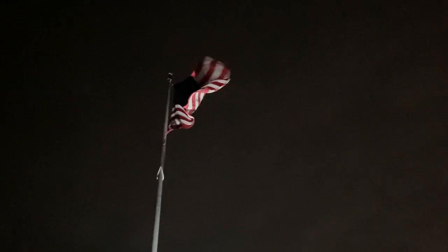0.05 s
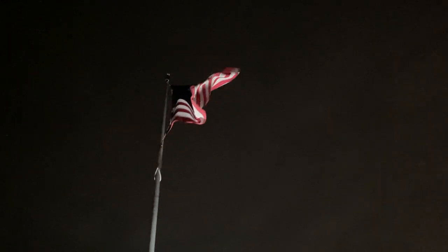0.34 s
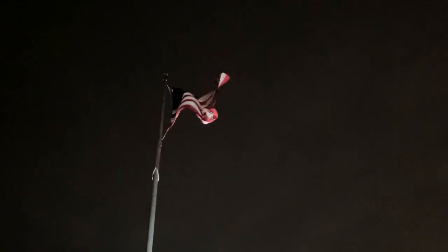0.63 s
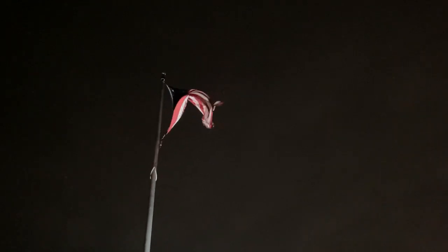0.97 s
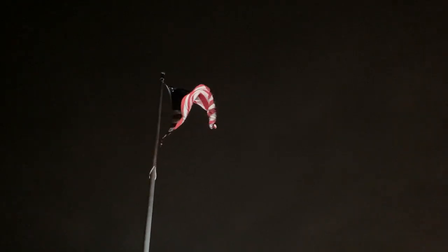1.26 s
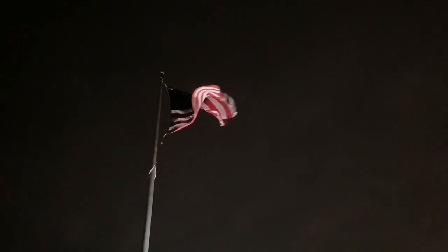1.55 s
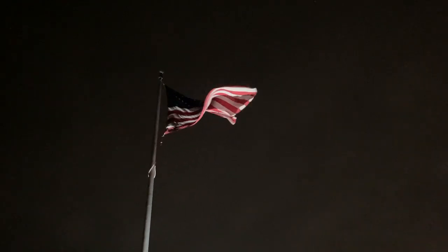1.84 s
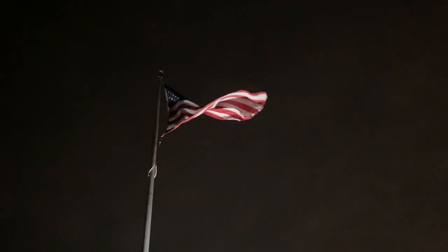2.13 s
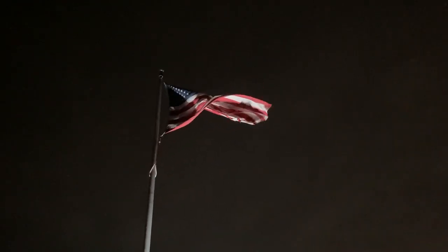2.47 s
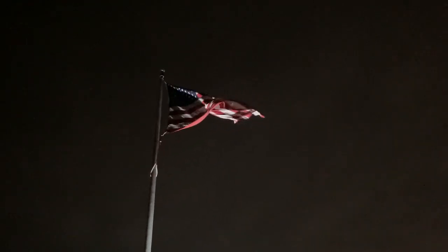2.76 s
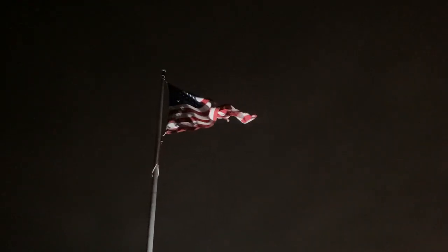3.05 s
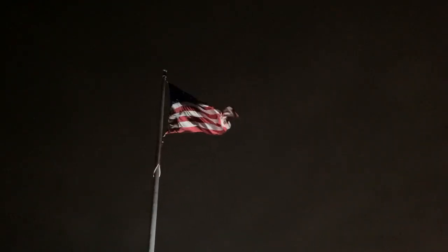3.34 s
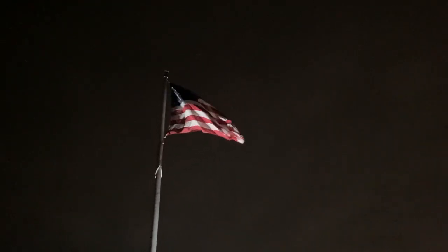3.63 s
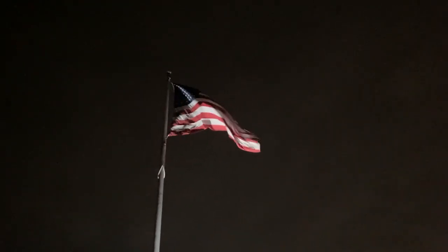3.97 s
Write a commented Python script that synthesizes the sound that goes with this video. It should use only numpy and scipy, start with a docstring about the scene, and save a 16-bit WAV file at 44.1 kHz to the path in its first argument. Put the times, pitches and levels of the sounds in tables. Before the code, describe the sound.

Metal clanks from a hook hitting a flagpole outdoors: a quick cluster first, two single knocks later. Between them come soft flag flaps and a distant car, while low wind increasingly buffets the microphone.

```python
"""Flag and metal pole at night

A flag flaps in soft bursts of noise. Its snap hook knocks and rattles on the tall pole; each impact
excites the pole's modes, which ring briefly. Gusts carry eddies past the microphone, whose pressure
is heard as a low flutter and thumps. A far car passes over a steady wash of traffic and faint hiss."""
import sys
import numpy as np
from scipy import signal
from scipy.fft import rfft, irfft
from scipy.io import wavfile
from scipy.ndimage import uniform_filter1d

SR = 44100
rng = np.random.default_rng(int(sys.argv[2]) if len(sys.argv) > 2 else 0)


def output_pcm(signal):
    """Save a mono or channel-first signal as 16-bit PCM at the path in sys.argv[1].

    Samples are clipped to [-1, 1] before scaling.
    """
    pcm = np.clip(np.atleast_2d(signal).T, -1, 1) * 32767
    wavfile.write(sys.argv[1], SR, np.round(pcm).astype(np.int16))


N = 176400

# impacts of the hook on the pole: (time [s], level [dB], treble tilt [dB/octave])
HOOK_IMPACTS = [(0.1895, -44, -2), (0.215, -54, -4.5), (.2198, -52, -5), (0.2433, -57, -5.5),
                (0.302, -54, -11), (0.308, -53.5, -8.5), (0.3215, -51, -4), (.329, -46.5, -5),
                (0.4535, -64, -12), (0.6657, -61, -13), (0.731, -61, -13), (1.391, -65.5, -11),
                (2.6584, -42.4, -3), (3.1258, -64.5, -7), (3.7535, -48.5, -12), (3.774, -59, -14)]
# crack of the contact: (frequency [Hz], relative level [dB])
CRACK_SPECTRUM = [(300, -39), (1200, -6.5), (3500, 8), (4500, 5), (5300, 5.5), (6100, -11), (8200, -5),
                  (9100, -26), (11000, -10), (15000, -26)]
# main modes of the pole: (frequency [Hz], relative level [dB])
POLE_MODES = [(1150, -4), (1388, -3), (1469, -2), (1655, -3), (1991, -3), (2222, -5), (2470, -3),
              (2675, -4), (2788, 0), (3032, 2), (3111, -1), (3407, 0), (3558, -2), (3671, 0), (3936, -5),
              (5005, -2)]
# clatter of its many weaker modes: (frequency [Hz], relative level [dB])
CLATTER_SPECTRUM = [(200, -31), (500, -2), (1400, 0.5), (2300, -7), (3400, -6), (4400, -3.5), (5300, -4.5),
                    (6100, -19.5), (8300, -11.5), (9100, -36), (15000, -54)]
# damping of those modes: (frequency [Hz], time to fall 60 dB [s])
CLATTER_DECAY = [(500, 0.19), (2500, 0.25), (5000, 0.16), (8000, 0.078), (12000, 0.059)]
# light touches of the hook alone: (time [s], level [dB], frequency [Hz])
HOOK_CLINKS = [(0.734, -72, 2850), (2.485, -70, 2720)]
# dull knocks as the hook falls back: (time [s], level [dB])
HOOK_KNOCKS = [(.316, -57.5), (.3415, -60), (2.672, -57)]
# one dull knock: (frequency [Hz], relative level [dB])
KNOCK_SPECTRUM = [(400, -18), (1200, 12), (2000, 2.5), (3200, -41.5)]
# tiny bright tick of the fittings: (time [s], level [dB])
FITTING_TICKS = [(.5655, -77.5)]
# that tick: (frequency [Hz], relative level [dB])
TICK_SPECTRUM = [(2000, -15), (9100, -7), (11000, 3), (13000, -17)]
# flaps of the cloth: (time [s], level [dB])
CLOTH_FLAPS = [(.392, -45.5), (.654, -48), (.77, -59), (1.066, -48.5)]
# one flap: (frequency [Hz], relative level [dB])
FLAP_SPECTRUM = [(50, -5.5), (110, 6.5), (200, -4), (500, -14), (1200, -30), (6000, -72)]
# wind at the microphone: (time [s], level [dB])
GUST_LEVELS = [(0, -51), (.35, -56), (.9, -53), (1.02, -61.5), (1.1, -52), (1.6, -51), (1.73, -55.5),
               (1.92, -45.5), (2.32, -53), (2.44, -47.5), (2.62, -54), (2.72, -43), (2.84, -42),
               (2.885, -57), (3.02, -41), (3.27, -46), (3.34, -62), (3.47, -46.5), (3.55, -57.5),
               (3.65, -41), (3.82, -38), (3.92, -48.5), (4, -41.5)]
# eddy pressure in a usual gust: (frequency [Hz], relative level [dB])
BUFFET_SPECTRUM = [(15, -38.5), (25, -21.5), (38, -9.5), (50, 1.5), (77, 0), (100, -6), (125, -10),
                   (170, -26.5), (1500, -110)]
# single large eddies: (time [s], level [dB], Gaussian half-width [s])
LARGE_EDDIES = [(1.561, -40, 0.017), (1.653, -40, 0.015), (2.383, -38.5, 0.017), (2.683, -40, 0.017),
                (2.786, -32, 0.023), (2.916, -37.5, 0.0095), (2.972, -34, 0.008), (3.092, -35.5, 0.018),
                (3.264, -41, 0.012), (3.678, -29.5, 0.0065), (3.772, -32, 0.012), (3.874, -31.5, .011)]
# passage of the far car: (time [s], level [dB])
CAR_LEVELS = [(0, -64), (.9, -71), (1.35, -60), (1.62, -53.5), (1.85, -56), (2.25, -60), (2.6, -63),
              (3.1, -66), (4, -72.5)]
# its tyres: (frequency [Hz], relative level [dB])
TYRE_SPECTRUM = [(200, -22), (450, -7), (660, -6.5), (770, 4), (880, 2), (980, -6), (1380, -6), (1510, -4),
                 (1720, -9.5), (1950, -26.5), (4000, -58.5)]
# wash of town traffic: (frequency [Hz], relative level [dB])
TOWN_SPECTRUM = [(20, -11.5), (55, 5), (125, 7), (175, 0.5), (250, -.5), (350, -5.5), (600, -3.5),
                 (850, -.5), (1150, -2.5), (1600, -9.5), (2000, -17.5), (2500, -27.5), (3500, -36),
                 (6000, -48)]
# microphone hiss: (frequency [Hz], relative level [dB])
HISS_SPECTRUM = [(1000, -7), (4000, 1.5), (5800, -1.5), (7800, 0), (8600, -5), (9150, -28.5), (9900, -2.5),
                 (11300, 0.5), (12700, -8.5), (13700, -14), (15000, -5.5)]
# likeness of left and right in the background: (frequency [Hz], correlation [0 to 1])
DIFFUSE_CORRELATION = [(60, 0.78), (300, 0.65), (1000, 0.8), (1900, 1), (3300, 0.099)]


def hook():
    """Impacts, clinks and knocks superpose; a path difference delays them at the right channel."""
    out = noise_bursts(HOOK_KNOCKS, KNOCK_SPECTRUM, rise_s=0.00072, fall_s=0.00072)
    for start, db, tilt_db in HOOK_IMPACTS:
        add(out, start, amp(db) * impact(tilt_db))
    for start, db, hz in HOOK_CLINKS:
        add(out, start, amp(db) * clink(hz))
    out[1] = irfft(rfft(out[1]) * delay(np.fft.rfftfreq(N, 1 / SR), lag_s=0.0001))
    return out


def impact(tilt_db, corner_hz=2320):
    """Impact excitation: a harder blow gives a stronger crack and more treble above the corner."""
    t = np.arange(SR // 3) / SR
    strike = amp(-4) * (amp(0.65 * tilt_db) * contact_crack(t) + pole_clatter(t) + pole_ring(t))
    return colour(strike, lambda hz: tilt_db * np.log2(np.maximum(hz / corner_hz, 1)))


def contact_crack(t, fall_s=0.0017):
    """A brief contact has a broad spectrum: an impulse and quickly dying noise."""
    contact = stereo_noise(len(t), correlation=0.9) * np.exp(-t / fall_s) + 2 * (t == 0)
    return unit_energy(colour(contact, lambda hz: lookup(CRACK_SPECTRUM, hz)))


def pole_clatter(t, rise_s=0.0024, chatter_db=3, chatter_s=0.0025):
    """Densely overlapping modes act as decaying noise, made uneven by the chattering hook."""
    bands, times, modes = signal.stft(stereo_noise(len(t), correlation=0.85), SR, nperseg=128)
    damping = amp(-60 * times / lookup(CLATTER_DECAY, bands)[:, None])
    decaying = signal.istft(modes * damping, nperseg=128)[1][:, :len(t)]
    chatter = unit_rms(uniform_filter1d(rng.standard_normal(len(t)), size=int(chatter_s * SR)))
    clatter = decaying * amp(chatter_db * chatter) * (1 - np.exp(-t / rise_s))
    return unit_energy(colour(clatter, lambda hz: lookup(CLATTER_SPECTRUM, hz)))


def pole_ring(t, t60_s=0.1, scatter_db=2):
    """Free vibration is a sum of damped normal modes, here varied in strength and phase."""
    ring = np.zeros(len(t))
    for hz, db in POLE_MODES:
        gain = amp(db + scatter_db * rng.standard_normal())
        ring += gain * np.sin(2 * np.pi * (hz * t + rng.random()))
    return unit_energy(np.array([ring, ring]) * amp(-60 * t / t60_s))


def clink(hz, t60_s=0.051):
    """Lightly touched, the hook rings as a damped oscillator of one frequency."""
    t = np.arange(SR // 10) / SR
    ring = np.sin(2 * np.pi * hz * t) * amp(-60 * t / t60_s)
    return unit_energy(np.array([ring, ring]))


def fittings():
    """A very short transient in the fittings is heard as a bright tick."""
    return noise_bursts(FITTING_TICKS, TICK_SPECTRUM, rise_s=0.00022, fall_s=0.0023)


def flag():
    """Each flap of the cloth displaces air in a soft, low pressure transient."""
    return noise_bursts(CLOTH_FLAPS, FLAP_SPECTRUM, rise_s=0.0016, fall_s=0.025)


def wind(smoothing_s=0.033, evenness=0.75):
    """Turbulent pressure at the microphone swells and quickens with each gust."""
    gust = envelope(GUST_LEVELS)
    travel = np.cumsum(eddy_speed(20 * np.log10(gust)))
    spectrum = amp(lookup(BUFFET_SPECTRUM, np.fft.rfftfreq(2 * N, 1 / SR)))
    field = irfft(rfft(stereo_noise(2 * N, correlation=0.77)) * spectrum)
    eddies = unit_rms(np.array([np.interp(travel, np.arange(2 * N), side) for side in field]))
    # partly even out chance swells, so that the gusts govern the level
    window = signal.windows.hann(2 * int(smoothing_s * SR) + 1)
    power = signal.fftconvolve((eddies ** 2).mean(0), window / window.sum(), "same")
    return gust * unit_rms(eddies / (abs(power) + 1e-6) ** (evenness / 2))


def thumps(usual_hz=66, scatter=0.08):
    """Each large eddy swings the pressure in both channels as a short Gaussian wave packet."""
    out, t = np.zeros(N), np.arange(N) / SR
    for centre, db, width_s in LARGE_EDDIES:
        hz = usual_hz * eddy_speed(db) * (1 + scatter * rng.standard_normal())
        swell = amp(db) * np.exp(-((t - centre) / width_s) ** 2 / 2)
        out += swell * np.sin(2 * np.pi * (hz * t + rng.random()))
    return out


def eddy_speed(db, usual_db=-44, octaves_per_db=0.015):
    """Convection: stronger gusts carry eddies faster. Gives speed relative to a usual gust."""
    return 2 ** (octaves_per_db * (db - usual_db))


def traffic():
    """Many distant sources merge into a wash, over which one car's tyre noise rises and fades."""
    town = amp(-58) * diffuse_noise(TOWN_SPECTRUM, patch_db=2.5)
    car = envelope(CAR_LEVELS) * diffuse_noise(TYRE_SPECTRUM, patch_db=3.0)
    return (town + car) * amp([[-0.6], [0.6]])  # slightly louder on the right


def hiss():
    """The microphone's self-noise sets a steady noise floor."""
    return amp(-84) * diffuse_noise(HISS_SPECTRUM, patch_db=0)


def diffuse_noise(spectrum, patch_db):
    """A diffuse field is partly coherent between two points; patch_db lets band levels drift."""
    hz = np.fft.rfftfreq(2048, 1 / SR)
    a, b, c, d, patches = rng.standard_normal((5, N // 512 + 5, len(hz)))
    patches = uniform_filter1d(patches, size=9, axis=0)  # smooth in time
    patches = unit_rms(uniform_filter1d(patches, size=5, axis=1))  # and in frequency
    left = a + 1j * b
    right = correlated(left, c + 1j * d, lookup(DIFFUSE_CORRELATION, hz)) * delay(hz, lag_s=0.000082)
    frames = np.array([left, right]) * amp(lookup(spectrum, hz) + patch_db * patches)
    return unit_rms(signal.istft(frames.transpose(0, 2, 1), nperseg=2048, noverlap=1536)[1][:, :N])


def noise_bursts(events, spectrum, rise_s, fall_s):
    """Unpitched transients: filtered noise with exponential rise and decay."""
    out, t = np.zeros((2, N)), np.arange(SR // 4) / SR
    for start, db in events:
        burst = stereo_noise(len(t), correlation=0.87) * (1 - np.exp(-t / rise_s)) * np.exp(-t / fall_s)
        add(out, start, amp(db) * unit_energy(colour(burst, lambda hz: lookup(spectrum, hz))))
    return out


def stereo_noise(size, correlation):
    """White noise, partly correlated between two channels."""
    left, independent = rng.standard_normal((2, size))
    return np.array([left, correlated(left, independent, correlation)])


def correlated(common, independent, correlation):
    """Independent noises add in power, so this blend keeps their level."""
    return correlation * common + np.sqrt(1 - correlation ** 2) * independent


def delay(hz, lag_s):
    """A time delay is a phase lag proportional to frequency."""
    return np.exp(-2j * np.pi * lag_s * hz)


def colour(x, gain_db, size=4096):
    """Minimum-phase filter: the phase follows from the log gain by the Hilbert transform."""
    log_gain = np.log(amp(gain_db(abs(np.fft.fftfreq(size, 1 / SR)))))
    response = np.fft.ifft(np.exp(signal.hilbert(log_gain).conj())).real
    return signal.fftconvolve(x, response[None, :size // 2], axes=1)[:, :x.shape[1]]


def amp(db):
    """Amplitude ratio of a level in decibels."""
    return 10 ** (np.asarray(db) / 20)


def unit_rms(x):
    """Normalisation to a mean power of 1."""
    return x / np.sqrt(np.mean(x ** 2) + 1e-20)


def unit_energy(x):
    """Normalisation of a transient to the energy of 10 ms at rms 1."""
    return x / np.sqrt(np.sum(x ** 2) / len(x) / (SR / 100) + 1e-20)


def lookup(table, hz):
    """Interpolation on a logarithmic frequency axis."""
    frequencies, values = np.transpose(table)
    return np.interp(np.log(hz + 1), np.log(frequencies + 1), values)


def envelope(points):
    """Amplitude envelope through points of (time [s], level [dB])."""
    return amp(np.interp(np.arange(N) / SR, *np.transpose(points)))


def add(mix, start_s, sound):
    """Superposition of a stereo sound on the mix."""
    part = mix[:, round(start_s * SR):][:, :sound.shape[1]]
    part += sound[:, :part.shape[1]]


def scene():
    """The pressures of independent sources add linearly."""
    cloth, tick, noise_floor = flag(), fittings(), hiss()
    return hook() + tick + cloth + wind() + thumps() + traffic() + noise_floor


def record(dry, cutoff_hz=15400):
    """A linear-phase low-pass filter limits the bandwidth."""
    lowpass = signal.firwin(511, cutoff_hz, window=("kaiser", 9), fs=SR)
    return signal.oaconvolve(dry, lowpass[None], "same")


dry = scene()
out = record(dry)
output_pcm(out)
```